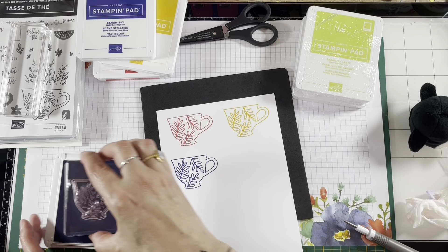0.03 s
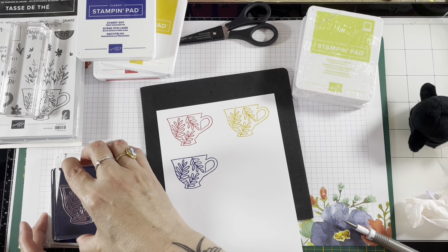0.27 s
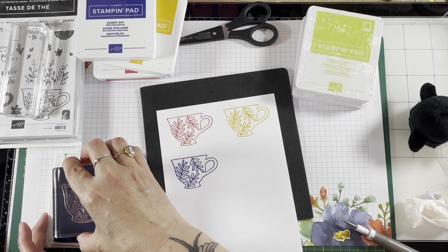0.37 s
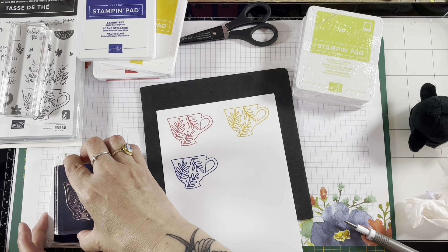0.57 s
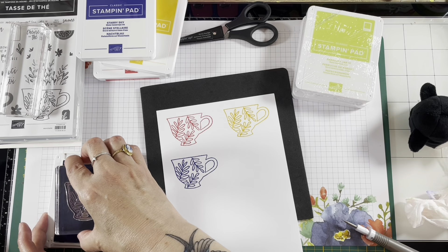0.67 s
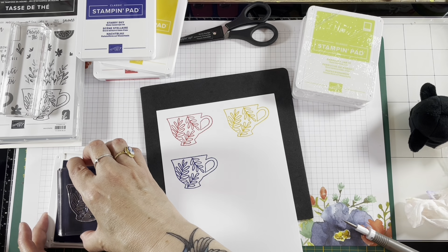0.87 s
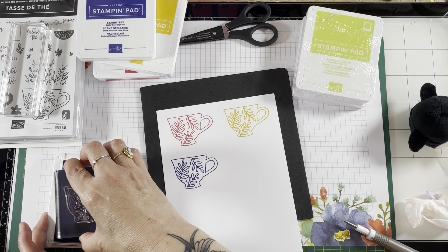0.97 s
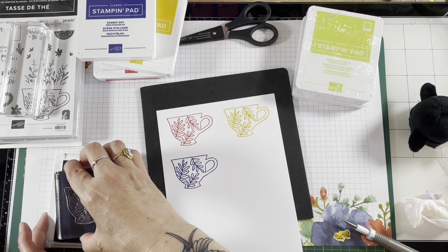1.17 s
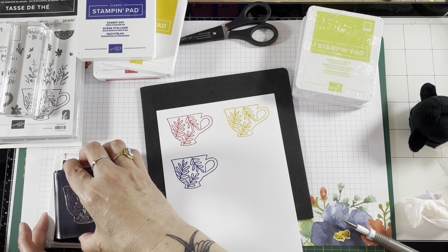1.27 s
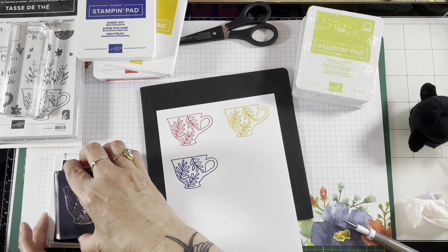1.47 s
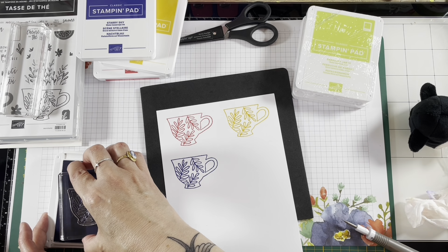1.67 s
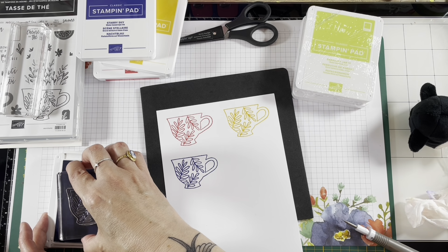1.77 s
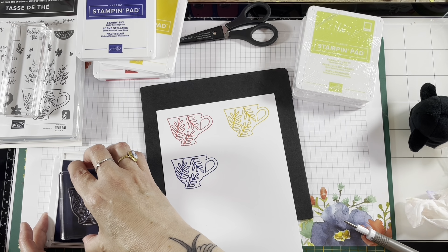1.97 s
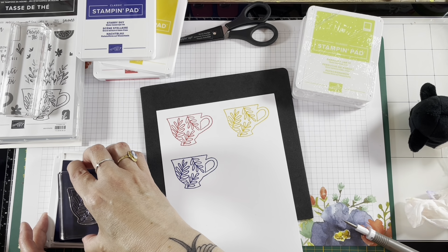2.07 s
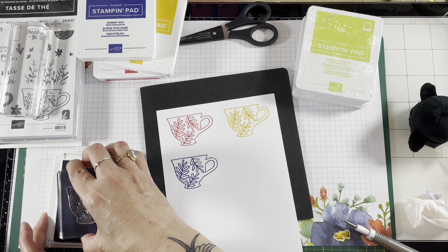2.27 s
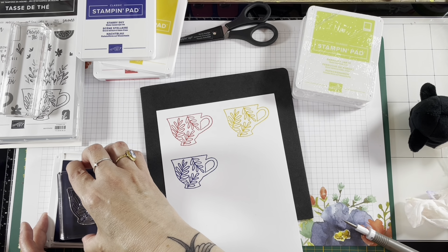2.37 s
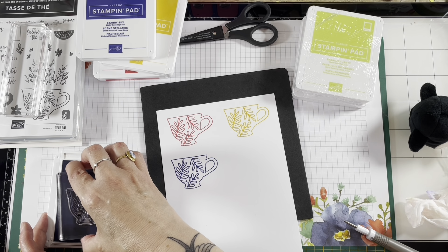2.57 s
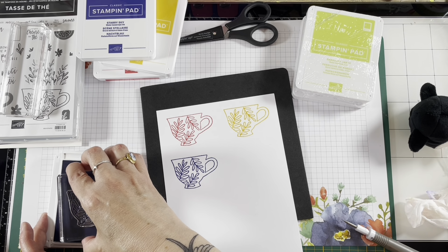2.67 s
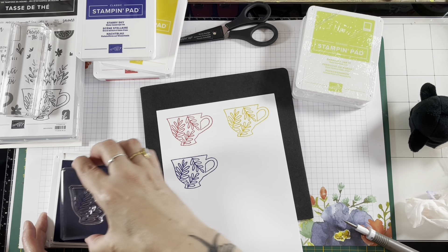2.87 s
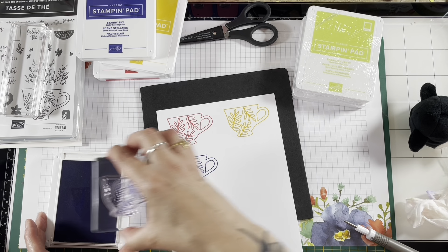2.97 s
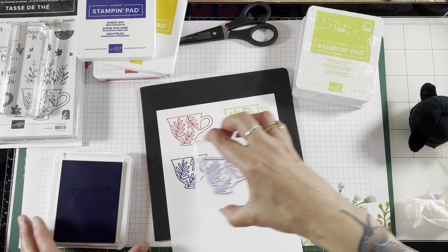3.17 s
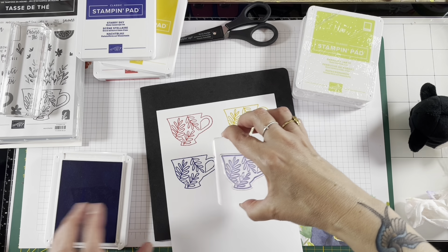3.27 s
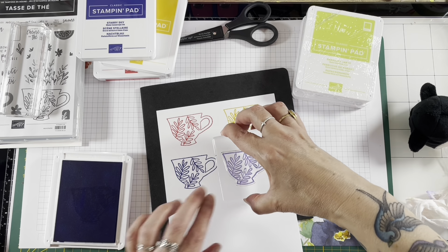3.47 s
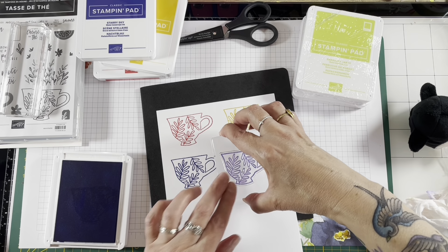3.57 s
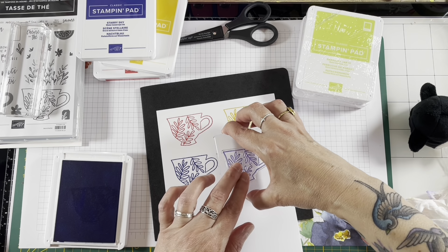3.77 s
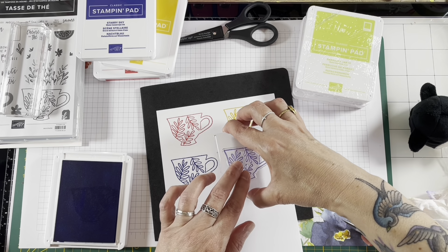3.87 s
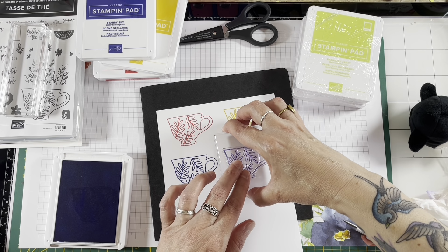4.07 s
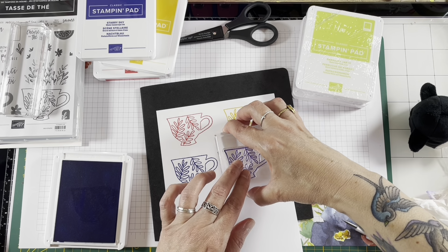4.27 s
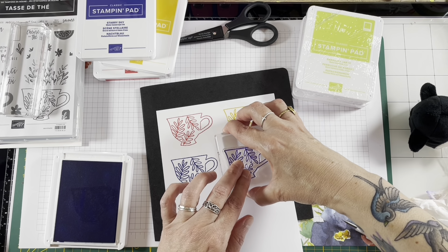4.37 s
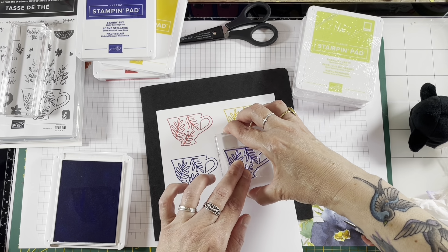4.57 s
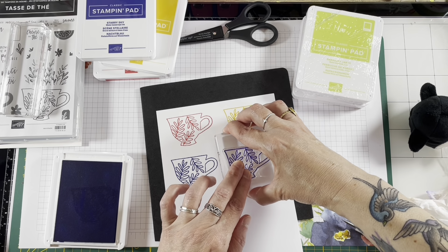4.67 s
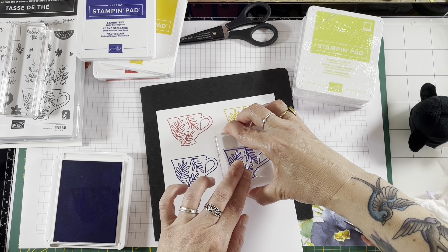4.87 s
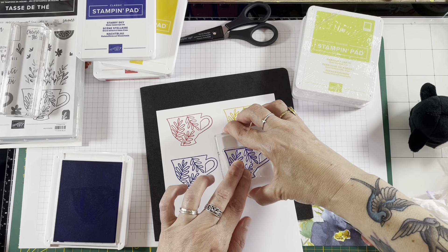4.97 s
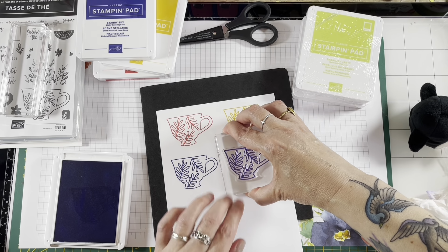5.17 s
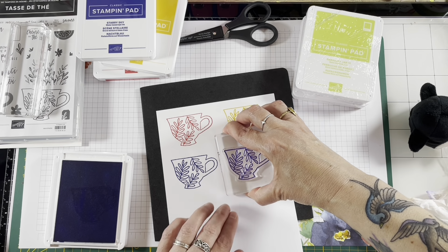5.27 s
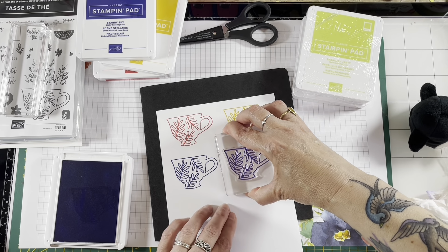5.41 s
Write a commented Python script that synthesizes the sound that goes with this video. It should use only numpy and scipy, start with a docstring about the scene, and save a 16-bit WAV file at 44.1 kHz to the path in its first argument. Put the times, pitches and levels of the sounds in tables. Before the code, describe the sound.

A rubber stamp taps repeatedly on an ink pad, then a brief crackle, two hollow knocks and a scrape over paper.

```python
"""Rubber stamp on a desk

A rubber stamp on a clear block is dabbed onto an ink pad: each dab slaps, shakes the desk and peels off.
Later something crackles, and a hollow object is knocked twice, then slid and scraped over paper.
Faint squeaks, soft bumps and a distant clock lie over the rumble of a quiet room."""
import sys
import numpy as np
from scipy import signal
from scipy.fft import rfft, irfft, next_fast_len
from scipy.io import wavfile
from scipy.ndimage import uniform_filter1d

SR = 44100
rng = np.random.default_rng(int(sys.argv[2]) if len(sys.argv) > 2 else 0)


def transcribe(u):
    """Save the signal u as a 16-bit wav file named by the first command-line argument.

    u: samples, shape (n,) or (channels, n), limited to [-1, 1]; the rate is SR.
    q: integer samples, one column per channel.
    """
    v = np.clip(np.atleast_2d(u).T, -1, 1)
    q = np.round(v * 32767).astype(np.int16)
    wavfile.write(sys.argv[1], SR, q)


N = 399105

# A fade time (t60) is how long a sound takes to drop 60 dB. Hardness boosts highs, in dB per octave.
# The room's background. Each row: time in seconds, rumble level in dB, hush level in dB.
ROOM_LEVELS = [(0.0, -69, -83.5), (0.3, -55, -81.5), (0.6, -63, -86), (1.03, -60, -82),
               (1.451, -50.5, -83.5), (1.81, -65.5, -82), (2.19, -57, -78), (2.65, -66.5, -78.5),
               (2.867, -51.5, -69), (3.151, -62.5, -75.5), (3.5, -56.5, -71), (3.85, -63, -80),
               (4.28, -63.5, -82), (4.62, -57, -79.5), (5.2, -64, -80), (6.27, -61.5, -75.5),
               (6.6, -60.5, -77.5), (6.9, -59.5, -76), (8.27, -60.5, -75.5), (9.05, -64.5, -80.5)]
# The tone colours of six noises. Each row: frequency in Hz, relative level in dB.
RUMBLE_COLOUR = [(12, -57), (20, -28), (41, -3), (59, 2.5), (73, -4), (87, -20), (116, -6.5), (162, -19.5),
                 (178, -25), (250, -27), (320, -63.5), (550, -120)]
HUSH_COLOUR = [(88, -31.5), (150, 1.5), (179, -10), (319, -1.5), (504, -9.5), (631, -11), (752, -12.5),
               (975, -13), (2500, -32), (3250, -68.5), (5500, -120)]
SLEEVE_COLOUR = [(150, -33.5), (330, -1.5), (700, -6), (1200, -4), (2500, -39), (5000, -120)]
MIC_NOISE_COLOUR = [(880, -19), (1500, -6), (1620, -6.5), (1780, -7), (2460, -9), (5280, -12), (9500, -18),
                    (12400, -44.5), (20900, -120)]
WIDE_NOISE_COLOUR = [(18, -46.5), (30, -15.5), (64, -3.5), (170, -4.5), (336, -5), (584, -4.5), (962, -7),
                     (2060, -24.5), (3140, -25), (9460, -30), (16000, -42.5)]
PAPER_COLOUR = [(880, -43.5), (1500, -19), (2080, -9), (2190, -7), (2660, -4.5), (3380, 0.5), (4000, -2),
                (7920, -7), (12100, -15.5), (16000, -19.5)]
# Soft bumps. Each row: start in seconds, level in dB, pitch in Hz, width in octaves.
BUMPS = [(.062, -79, 3400, .35), (.105, -60.5, 1900, 0.56), (7.798, -53, 5500, 0.19),
         (4.285, -57, 352, 0.81), (5.05, -55.5, 550, 0.18), (5.075, -52.5, 560, 0.21),
         (5.63, -55.5, 624, 0.27), (6.09, -42, 574, 0.2), (6.095, -48, 250, 0.52)]
# Short swishes over paper. Each row: loudest moment in seconds, level in dB, fall in dB per second.
SWISHES = [(.07, -78, 203), (6.125, -64, 238), (6.47, -82, 106), (7.214, -68, 51.5)]
# Long strokes over paper, one list each. Each row: time in seconds, hiss level in dB.
SLIDES = [
    [(7.3, -101), (7.47, -69.5), (7.57, -65.5), (7.62, -68), (7.7, -63.5), (7.8, -73.5), (7.92, -83),
     (8.1, -82)],
    [(8.1, -81), (8.17, -73), (8.22, -58.5), (8.26, -77), (8.32, -89), (8.35, -65.5), (8.48, -83),
     (8.56, -86)],
    [(8.56, -82.5), (8.65, -70), (8.71, -73.5), (8.74, -66.5), (8.85, -68), (8.9, -70.5), (8.95, -82),
     (9.05, -91)],
]
# The object drags hard. Each row: start and length in seconds, first and last level in dB.
RASPS = [(8.219, 0.018, -74, -102), (8.257, 0.063, -54.5, -55), (8.753, 0.095, -56, -73)]
# Resonances of the dragged object and the loose pad case. Each row: pitch and width in Hz, level in dB.
SCRAPE_PEAKS = [(621, 86, -1), (970, 35, 1.5), (1300, 23, -1), (1655, 29, 6), (1869, 80, -6),
                (2066, 91, -7), (2435, 73, 3), (2478, 45, -2), (2930, 79, -7.5), (3600, 60, -7.5),
                (3986, 67, -5), (4550, 50, -7), (5203, 54, -10.5), (6150, 160, -19)]
RATTLE_PEAKS = [(740, 300, 1.5), (1300, 73, 0), (1746, 120, 2), (2306, 70, 1), (2740, 200, -11),
                (4130, 500, -24.5), (4630, 490, -19)]
# Swells of the room's low hush, and small dry ticks. Each row: start in seconds, level in dB.
HUSH_SWELLS = [(0.129, -67), (1.261, -67), (2.01, -62), (3.151, -78), (4.55, -71.5), (6.85, -70)]
TICKS = [(0.591, -72), (5.3164, -58), (6.675, -67.5), (6.9774, -67)]
# The clock's unevenness. Each entry: how much louder one tick is, in dB.
CLOCK_ACCENTS_DB = [0.5, -5.5, 0.5, 1.5, -2]
# Stamp dabs. Each row: start in seconds, slap and desk thud in dB, hardness, pressed pad's pitch in Hz,
# edge clack's pitch in Hz and relative level in dB, rattle in dB, boost of the case's ring in dB.
DABS = [(0.845, -56.5, -54.5, -6, 424, 920, -5, -77, 5), (0.937, -60, -63.5, -2, 435, 1230, -3, -69, 3),
        (1.128, -39.5, -40, -2, 445, 2780, -14, -54.5, 3.5),
        (1.319, -33.5, -35.5, -4, 494, 1344, -5, -46.5, 4.5),
        (1.508, -37.5, -35.5, 2, 343, 1193, -5.5, -48, -2.5),
        (1.68, -46.5, -42.5, -11.5, 487, 1320, -15, -75, -2.5),
        (1.843, -46.5, -40, -10.5, 488, 1000, -4, -57.5, 2.5),
        (1.996, -51, -44, -9, 390, 950, -13, -65.5, 4), (2.133, -51, -48.5, -11, 450, 829, -13, -82, 2),
        (2.305, -43.5, -41, -4, 455, 1090, -24, -64, -1),
        (2.488, -46, -39.5, -10, 528, 800, -13, -58.5, 2.5),
        (2.669, -35, -34.5, 0, 350, 1290, -4, -49, -2.5)]
# The tones that struck things ring with. Each row: pitch in Hz, relative level in dB, fade in seconds.
CASE_TONES = [(318, -8, 0.058), (654, 4, 0.024), (771, -7.5, 0.043), (917, -10, 0.065),
              (1250, -12.5, 0.045), (1614, -12, 0.025), (2000, -16.5, 0.022), (2310, -17.5, 0.016),
              (2760, -18.5, .02), (3700, -33, .015)]  # stamp block and pad case
DESK_TONES = [(53.3, 1.5, 0.34), (60.87, 4, 0.4), (83.1, -7.5, 0.3), (104.2, 10.5, 0.25), (119.4, 4, 0.28),
              (150.8, -0.5, 0.24), (218.7, -18.5, 0.24), (330, -10.5, 0.022)]
BRITTLE_TONES = [(1496, -1.5, 0.026), (1680, -32, 0.022), (2150, -13, 0.013), (2550, 5, 0.023),
                 (2700, 0, .02), (3500, 0, 0.032), (3820, 0.5, 0.018), (4330, -8, 0.015),
                 (4620, -4.5, 0.028), (5700, 0, 0.016), (6180, 2, 0.022), (6740, -9, 0.022),
                 (7600, -4, 0.0061)]
HOLLOW_TONES = [(291.3, -21.5, 0.093), (463.3, -8.5, 0.054), (530, -12, 0.07), (588, 6.5, 0.043),
                (628, -7, .05), (733, -16.5, 0.03), (910, -7, 0.046), (972, -12.5, 0.05),
                (1318, -24.5, 0.058), (1612, -25, 0.057), (1820, -15, 0.019), (1974, -22.5, 0.025),
                (2480, -23.5, 0.021), (3484, -28, 0.013), (4850, -36.5, 0.01454)]
# Squeaks. Each row: start and length in seconds, first and last pitch in Hz, level in dB.
SQUEAKS = [(1.062, 0.15, 4030, 3130, -73.5), (2.426, 0.1, 3300, 2780, -77),
           (2.894, 0.21, 4600, 2920, -79.5), (3.957, 0.15, 4490, 2780, -76.5),
           (6.435, 0.23, 4320, 2790, -80.5)]
# The rubber peels off. Each row: start in seconds, sticky noise and case knock in dB,
# fade of the sticky noise in seconds.
PEELS = [(1.188, -69.5, -46, 0.065), (1.3008, -73, -53, 0.057), (1.349, -72, -67, 0.081),
         (1.388, -59.5, -49, 0.055), (1.548, -69, -58, 0.05), (1.582, -60.5, -47, 0.04),
         (1.7585, -60.5, -54.5, 0.04), (1.9235, -68, -54.5, .05), (2.0666, -69, -55, 0.061),
         (2.215, -56.5, -53.5, 0.044), (2.371, -55.5, -51.5, 0.041), (2.568, -60, -46.5, 0.046),
         (2.781, -62, -44, 0.095), (3.045, -60.5, -54, 0.065)]
# Brittle snaps; then the knocked object's crisp edge and rebounds, and catches of the dragged object. Each row:
# start in seconds, peak in dB, hardness, multiplier for the ring's length.
SNAPS = [(6.08, -57, -5, 0.7), (6.0845, -65, -1, 0.76), (6.091, -46, -13, 0.6), (6.0935, -37, 5, 0.92),
         (6.102, -35, -14.5, 0.62), (6.0995, -30.5, -2, 0.38), (6.1045, -32, 9, 0.33),
         (6.1073, -29, 2, 0.37), (6.1135, -35, 1.5, 0.31), (6.127, -62, -2, 0.6)]
REBOUNDS_AND_CATCHES = [(7.8165, -57, 9, 0.25), (7.825, -59, -11, 0.6), (7.838, -44, -6, 1), (7.853, -58.5, 4, 0.72),
                        (8.2405, -27.5, 3, 0.55), (8.2432, -32.5, -1, 0.87), (8.249, -40, 4.5, 0.44),
                        (8.257, -55.5, -1, 0.64), (8.264, -44, 4, 0.46), (8.27, -43, -1, 0.52), (8.2795, -44, -1, 0.51),
                        (8.294, -50, 1, 0.81), (8.303, -43, 10, 0.95), (8.311, -45, -5, 0.43), (8.331, -40, 16, 0.6),
                        (8.685, -58, 28, 0.33), (8.817, -57.5, -27, 0.87)]
# Knocks and their bounces. Each row: start in seconds, peak in dB, hardness,
# multiplier for the ring's length, seconds it rings freely.
KNOCKS = [(7.286, -11, 2.5, 1, .011), (7.3025, -23, -4.5, 3.3, 0.015), (7.332, -38, -2, 1.4, .01),
          (7.817, -22, -3, 1.2, 0.026), (7.84, -40.5, -3, 0.95, .01)]
# The knocks shake the desk. Each row: start in seconds, peak in dB, hardness.
DESK_THUDS = [(7.296, -35.5, 15), (7.816, -34.5, 12.5), (7.839, -37.5, 6)]
# The room's echo. Each row: frequency in Hz, fade time in seconds.
ECHO_FADES = [(100, 0.24), (300, 0.48), (600, 0.35), (1500, 0.27), (4000, 0.26), (10000, 0.18)]
# How far the left microphone leads the right. Each row: frequency in Hz, phase in radians.
LEFT_LEAD = [(150, 0.6), (380, 0.35), (620, 0.46), (900, 0.77), (1500, 0.34), (2200, 0.33), (3300, 1.32),
             (5000, .5), (7500, 1.8), (16000, 2.5)]
# Left-right balance. Each row: frequency in Hz, share of the panning (negative leans right).
PAN_SHARES = [(200, 0.45), (600, 0.72), (1000, 0.76), (1500, -0.41), (3000, -0.63), (6000, .05)]
# What both sides share has dull treble but a lifted very top. Each row: frequency in Hz, gain in dB.
CENTRE_COLOUR = [(20, 2.5), (8000, -3.5), (9500, -6), (10300, -19.5), (13800, -27.5), (15000, 11)]


def gain_of(db):
    """Turns decibels into a multiplier."""
    return 10 ** (np.asarray(db) / 20)


def evened(x):
    """Scales a signal to an average (rms) level of 1."""
    return x / np.sqrt(np.mean(x ** 2) + 1e-20)


def wobble(count, smoothing):
    """A random wander; more smoothing makes it slower."""
    return evened(uniform_filter1d(rng.standard_normal(count), size=smoothing))


def look_up(points, hz):
    """Reads between the rows of a frequency table."""
    f, value = np.transpose(points)
    return np.interp(np.log(hz + 1), np.log(f + 1), value)


def add(mix, s, sound):
    """Adds a sound at s seconds."""
    part = mix[round(s * SR):][:len(sound)]
    part += sound[:len(part)]


def coloured(x, colour):
    """Filters a signal by a tone colour table."""
    size = next_fast_len(x.shape[-1])
    gains = gain_of(look_up(colour, np.fft.rfftfreq(size, 1 / SR)))
    return irfft(rfft(x, size) * gains, size)[..., :x.shape[-1]]


def resonant(peaks):
    """Turns resonances into a tone colour with little bass."""
    hz = np.geomspace(100, 16000, num=300)
    power = sum(gain_of(2 * db) / (1 + (2 * (hz - f) / width) ** 2) for f, width, db in peaks)
    return np.c_[hz, 10 * np.log10(power / (1 + (500 / hz) ** 4))]


def noise(colour, patchy_db, frames=7):
    """Coloured noise whose level drifts in patches of pitch and time."""
    real, imag, patches = rng.standard_normal((N // 512 + 3, 513, 3)).T
    patches = uniform_filter1d(patches, size=10, axis=0)
    patches = evened(uniform_filter1d(patches, size=frames, axis=1))
    spectra = (real + 1j * imag) * gain_of(patchy_db * patches)
    white = signal.istft(spectra, nperseg=1024, noverlap=512)[1][:N]
    return evened(coloured(white, colour))


def ring(tones, rise_cycles, lag_cycles, hard_db=0., detune=0., longer=1., scatter_db=0.):
    """Fading tones with a peak of 1; low ones arrive later and swell slower, as bending waves do."""
    out = np.zeros(int(SR * min(.5, .03 + longer * max(tone[2] for tone in tones))))
    for (hz, db, t60), (pitch_luck, level_luck) in zip(tones, rng.standard_normal((len(tones), 2))):
        t = np.maximum(np.arange(len(out)) / SR - lag_cycles / hz, 0)
        swell = (1 - np.exp(-t * hz / rise_cycles)) ** 2
        start_db = db + scatter_db * level_luck + hard_db * np.log2(hz / 600)
        level = gain_of(start_db - 60 * t / (t60 * longer))
        out += level * swell * np.sin(2 * np.pi * hz * (1 + detune * pitch_luck) * t)
    return out / abs(out).max()


def burst(db, hz, octaves, t60, rise_s=0.00017):
    """A puff of noise around one pitch that rises and fades."""
    t = np.arange(16384) / SR
    bell = np.exp(-.5 * (np.log2(np.fft.rfftfreq(len(t), 1 / SR) / hz + 1e-9) / octaves) ** 2)
    puff = evened(irfft(rfft(rng.standard_normal(len(t))) * bell))
    return puff * gain_of(db - 60 * t / t60) * (1 - np.exp(-t / rise_s))


def background():
    """The room's rumble and hush wander, sleeves shift on paper and the microphone hisses."""
    s, rumble_db, hush_db = np.transpose(ROOM_LEVELS)
    t = np.arange(N) / SR
    rumble = noise(RUMBLE_COLOUR, 1.5) * gain_of(np.interp(t, s, rumble_db))
    hush = noise(HUSH_COLOUR, 1.7, frames=14) * gain_of(np.interp(t, s, hush_db))
    stir = evened(uniform_filter1d(wobble(N, 4000), size=2000))
    sleeves = noise(SLEEVE_COLOUR, 3, frames=4) * gain_of(-86 + 4.5 * np.tanh(stir))
    mic_hiss = gain_of(-86.5) * noise(MIC_NOISE_COLOUR, 2.2)
    wide = gain_of(-76) * noise(WIDE_NOISE_COLOUR, 1.0) * np.array([[1], [-1]])  # opposite on each side
    return rumble + hush + sleeves + mic_hiss + wide


def soft_bumps():
    """Puffs of noise that start gently."""
    out = np.zeros(N)
    for s, db, hz, octaves in BUMPS:
        add(out, s, burst(db, hz, octaves, t60=0.094, rise_s=0.019))
    return out


def paper_strokes():
    """Paper hisses under each stroke; the object sticks and slips about 90 times a second and rasps."""
    t = np.arange(N) / SR
    slip_count = np.cumsum(90 * (1 + 0.13 * wobble(N, 600))) / SR
    slips = 0.35 + np.exp(-(slip_count % 1) / 0.31)
    hiss = noise(PAPER_COLOUR, 2.1, frames=3)
    scrape = evened(slips * noise(resonant(SCRAPE_PEAKS), 0.97))
    rise_db_per_s, edge_db_per_s = 563.5, 743.5
    rub = sum(gain_of(np.interp(t, *np.transpose(rows), -200, -200)) for rows in SLIDES)
    for s, db, fall_db_per_s in SWISHES:
        rub += gain_of(db - np.maximum(rise_db_per_s * (s - t), fall_db_per_s * (t - s)))
    drag = gain_of(-16) * rub  # even a light stroke scrapes a little
    for s, length, first_db, last_db in RASPS:
        outside_s = np.maximum(np.maximum(s - t, t - s - length), 0)
        drag += gain_of(np.interp(t, [s, s + length], [first_db, last_db]) - edge_db_per_s * outside_s)
    return hiss * rub + scrape * drag


def hush_swells():
    """The room's low hush swells softly and slowly fades."""
    out = np.zeros(N)
    for s, db in HUSH_SWELLS:
        add(out, s, burst(db, hz=363, octaves=0.27, t60=0.57, rise_s=0.019))
    return out


def clock():
    """A distant clock ticks every two seconds, dull with a faint high edge."""
    out = np.zeros(N)
    for s, db in zip(np.arange(.445, N / SR, 2.0), CLOCK_ACCENTS_DB):
        add(out, s, burst(db - 64, hz=953, octaves=0.081, t60=0.32, rise_s=0.045))
        add(out, s, burst(db - 73, hz=3050, octaves=0.2, t60=0.22, rise_s=0.013))
    return out


def dry_ticks():
    """Tiny, bright puffs of noise."""
    out = np.zeros(N)
    for s, db in TICKS:
        add(out, s, burst(db, hz=3570, octaves=0.9, t60=0.032, rise_s=0.0014))
    return out


def stamp_dabs():
    """Each dab slaps the pad case and shakes the desk; the loose case rattles while the desk swings."""
    slaps, desk, rattle_level = np.zeros((3, N))
    for s, slap_db, thud_db, hard_db, pad_hz, clack_hz, clack_db, rattle_db, case_db in DABS:
        shake = ring(DESK_TONES, 0.53, 0.95, detune=0.014)
        add(desk, s, gain_of(thud_db) * shake)
        case = [(hz, db + case_db, t60) for hz, db, t60 in CASE_TONES]
        pad = (pad_hz, 6, 0.034)
        clack = (clack_hz, clack_db - hard_db * np.log2(clack_hz / 600), 0.038)  # cancels the hardness
        add(slaps, s, gain_of(slap_db) * ring(case + [pad, clack], 0.69, 0.34, hard_db, detune=0.028))
        speed = abs(np.gradient(shake))
        jolt = 0.5 * np.exp(-np.arange(len(shake)) / (0.027 * SR))
        add(rattle_level, s, gain_of(rattle_db) * (speed / speed.max() + jolt) ** 1.4)
    rattle = coloured(rattle_level * rng.standard_normal(N), resonant(RATTLE_PEAKS))
    return slaps + rattle, desk


def squeaks():
    """Faint, fuzzy whistles that fall in pitch."""
    out = np.zeros(N)
    for s, length, start_hz, end_hz, db in SQUEAKS:
        count = round(length * SR)
        whistle = np.sin(2 * np.pi * np.cumsum(np.linspace(start_hz, end_hz, count)) / SR)
        add(out, s, gain_of(db) * wobble(count, 60) * whistle * np.hanning(count))
    return out


def stamp_peels():
    """Sticky rubber peels off the pad, with a ring of the case and a dull thump."""
    out = np.zeros(N)
    for s, sticky_db, knock_db, t60 in PEELS:
        add(out, s, burst(sticky_db, hz=3280, octaves=0.64, t60=t60, rise_s=0.0058))
        case = ring(CASE_TONES, 5.1, 1.6, hard_db=-0.75, detune=0.09, scatter_db=-1.5)
        add(out, s, gain_of(knock_db - 11.5) * case)
        add(out, s, burst(knock_db + 0.5, hz=645, octaves=0.7, t60=0.048, rise_s=0.011))
    return out


def snaps(events, tones, grit_db):
    """Each sudden release chatters for an instant and rings another spot, with a crack and some grit."""
    out = np.zeros(N)
    for s, db, hard_db, longer in events:
        chatter = rng.standard_normal(300) ** 3 * np.exp(-np.arange(300) / (.0008 * SR))
        tone = ring(tones, 0.7, 0.78, hard_db, detune=0.085, longer=longer, scatter_db=3.5)
        clack = np.convolve(chatter, tone)
        add(out, s, gain_of(db) * clack / abs(clack).max())
        crack = burst(db - 7.5, hz=4950, octaves=0.7, t60=.009)
        grit = burst(db + grit_db, hz=2250, octaves=0.43, t60=0.028)
        add(out, s, crack + grit)
    return out


def hollow_knocks():
    """A hollow object rings at each contact until it sits down again; the desk shakes just after."""
    rings, crunch, desk = np.zeros((3, N))
    choke_db_per_s = 3498
    for s, db, hard_db, longer, free_s in KNOCKS:
        tone = ring(HOLLOW_TONES, 1.6, 0.033, hard_db, longer=longer)
        seated_s = np.maximum(np.arange(len(tone)) / SR - free_s, 0)
        add(rings, s, tone * gain_of(db - choke_db_per_s * seated_s))
        crack = burst(db - 27.5, hz=2000, octaves=0.94, t60=0.054)
        add(crunch, s, crack + burst(db - 24, hz=590, octaves=0.76, t60=0.23, rise_s=0.015))
    for s, db, hard_db in DESK_THUDS:
        add(desk, s, gain_of(db) * ring(DESK_TONES, 0.22, 1.5, hard_db, detune=0.015))
    return rings, crunch, desk


def rebounds_and_catches():
    """The knocked object rebounds, and later the dragged object catches and lets go; the hand on it shortens
    its ring."""
    damping_hz = 158
    tones = [(hz, db, np.log(1000) / (np.pi * (width + damping_hz))) for hz, width, db in SCRAPE_PEAKS]
    return snaps(REBOUNDS_AND_CATCHES, tones, grit_db=-11)


def room_echo(x):
    """Many small reflections, different on each side; each pitch fades at its own speed."""
    taps = np.zeros((2, SR // 2))
    arrivals = np.arange(300, SR // 2 - 20, 20) + rng.integers(0, 20, (2, (SR // 2 - 301) // 20))
    np.put_along_axis(taps, arrivals, rng.choice([-1., 1.], arrivals.shape), 1)
    hz, t, spectra = signal.stft(taps, SR, nperseg=256)
    fade = gain_of(-60 * t / look_up(ECHO_FADES, hz)[:, None])
    tail = signal.istft(spectra * fade, SR, nperseg=256)[1]
    tail = tail + 0.25 * tail[::-1]  # each side hears some of the other's echoes
    return signal.fftconvolve(x[None], tail / np.linalg.norm(tail[0]), axes=1)[:, :N]


def stereo(x, pan_db, lead_share=1):
    """Two close microphones: the balance and timing between them change with pitch."""
    size, side = next_fast_len(N), np.array([[1], [-1]])
    hz = np.fft.rfftfreq(size, 1 / SR)
    phase = np.exp(.5j * side * lead_share * look_up(LEFT_LEAD, hz))
    balance = gain_of(side * pan_db * look_up(PAN_SHARES, hz) / 2)
    return irfft(rfft(x, size) * phase * balance, size)[:, :N]


def scene():
    """Sounds in the air come with the room's echo; the desk's shaking reaches both sides alike."""
    dabs, dab_thuds = stamp_dabs()
    handling = dabs + stamp_peels() + dry_ticks() + soft_bumps() + hush_swells()
    knocks, crunch, knock_thuds = hollow_knocks()
    small = paper_strokes() + snaps(SNAPS, BRITTLE_TONES, grit_db=-23) + rebounds_and_catches()
    small += squeaks() + clock()
    direct = stereo(handling, 2.0) + stereo(knocks + crunch, 2.5, lead_share=.9) + stereo(small, 0.37)
    echo = room_echo(gain_of(-13.5) * (handling + small) + gain_of(-23) * knocks + gain_of(-9) * crunch)
    return direct + echo + dab_thuds + knock_thuds + background()


def record(dry):
    """Colours what both sides share, then cuts everything above 15.9 kHz."""
    mid, side = (dry[0] + dry[1]) / 2, (dry[0] - dry[1]) / 2
    pair = coloured(mid, CENTRE_COLOUR) + side * np.array([[1], [-1]])
    low_pass = signal.firwin(511, 15900, window=("kaiser", 9), fs=SR)
    return signal.oaconvolve(pair, low_pass[None], "same")


dry = scene()
out = record(dry)
transcribe(out)
```